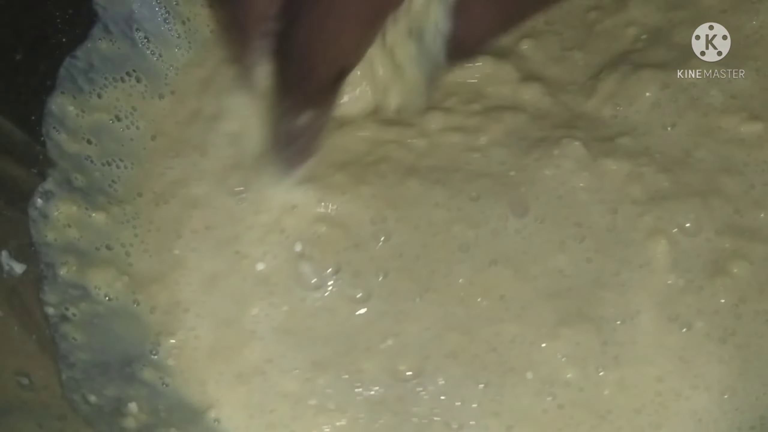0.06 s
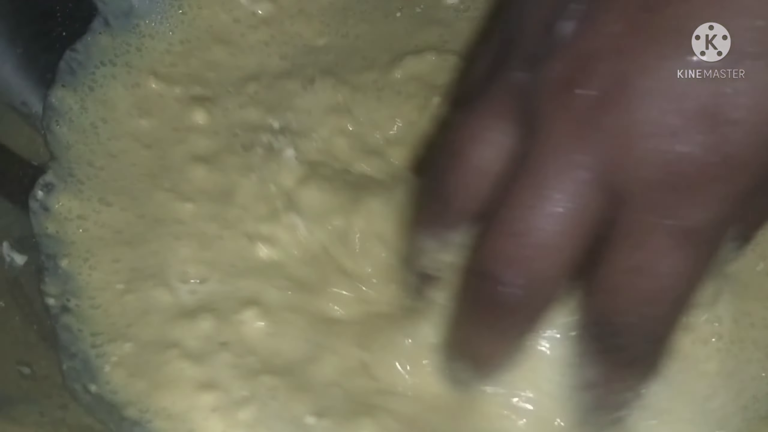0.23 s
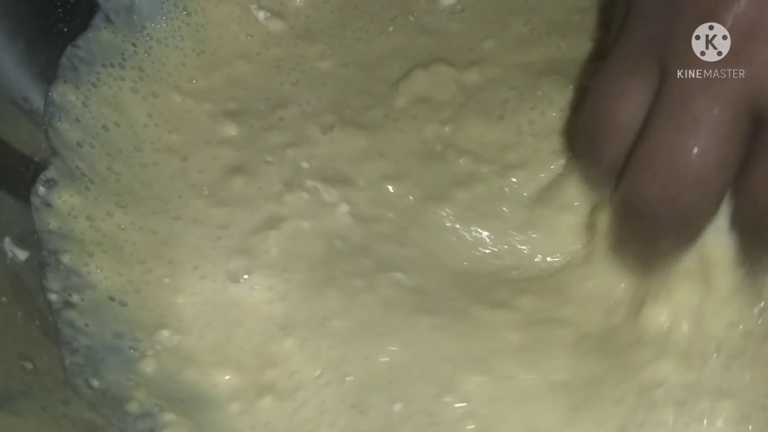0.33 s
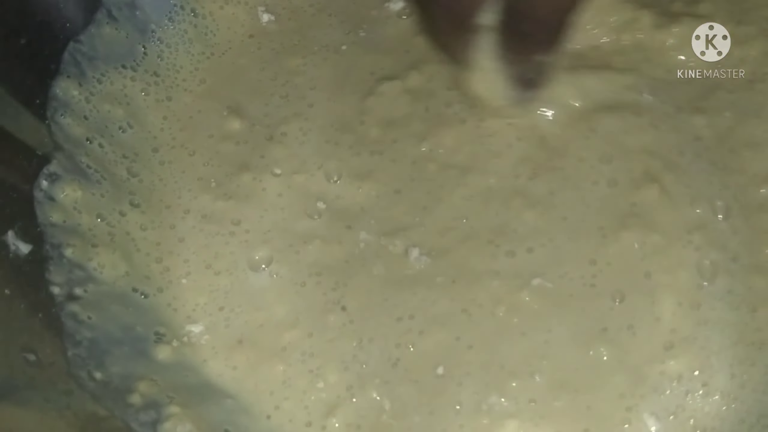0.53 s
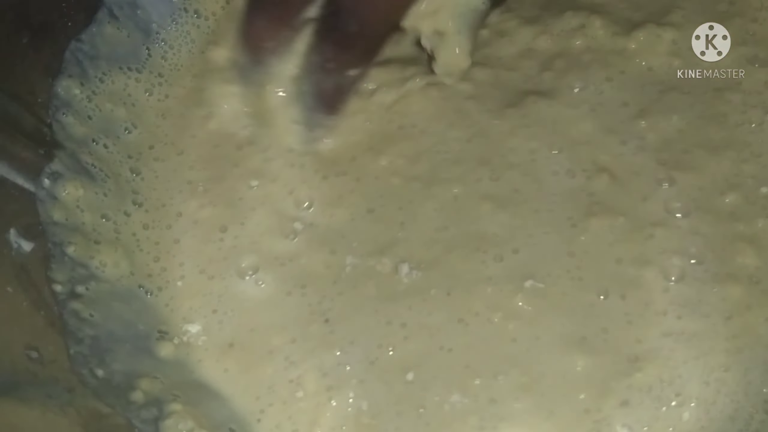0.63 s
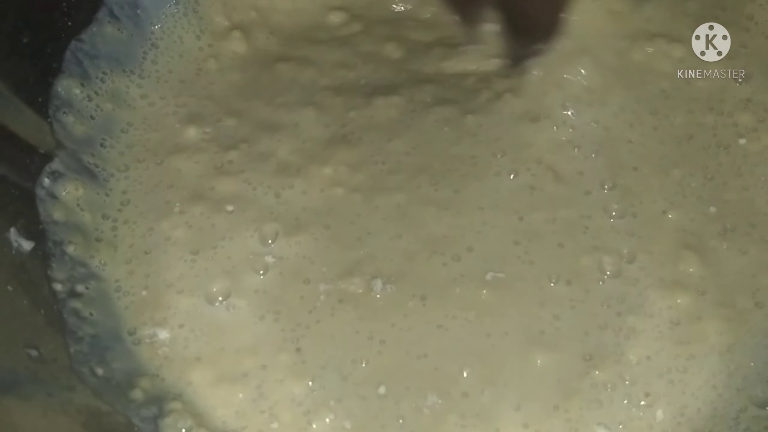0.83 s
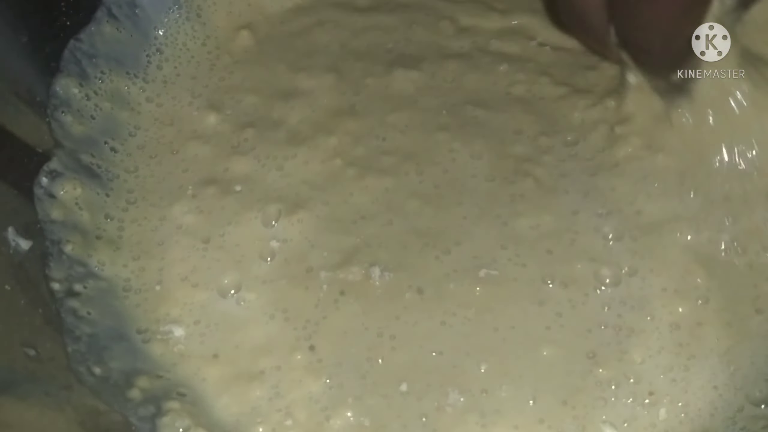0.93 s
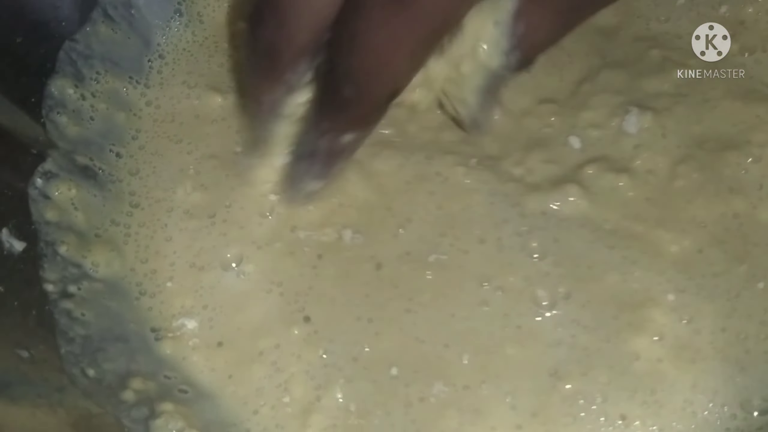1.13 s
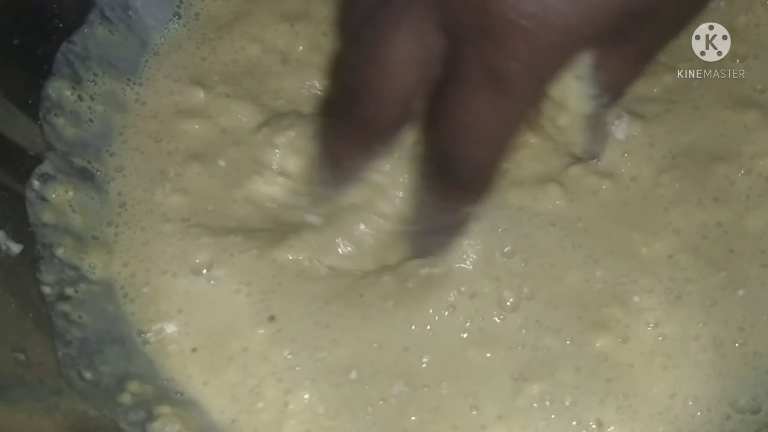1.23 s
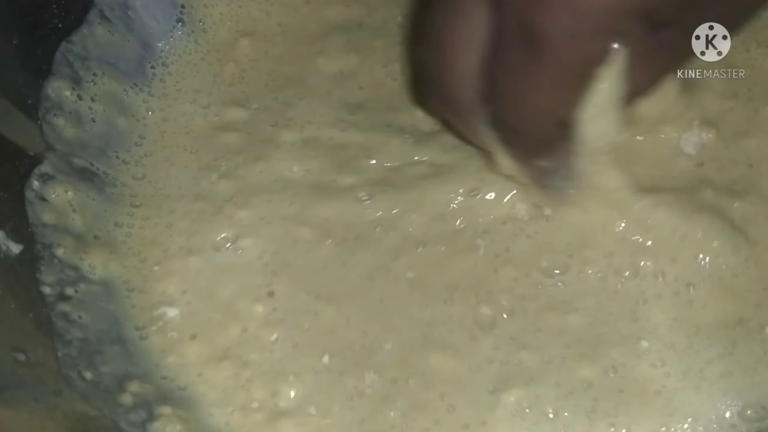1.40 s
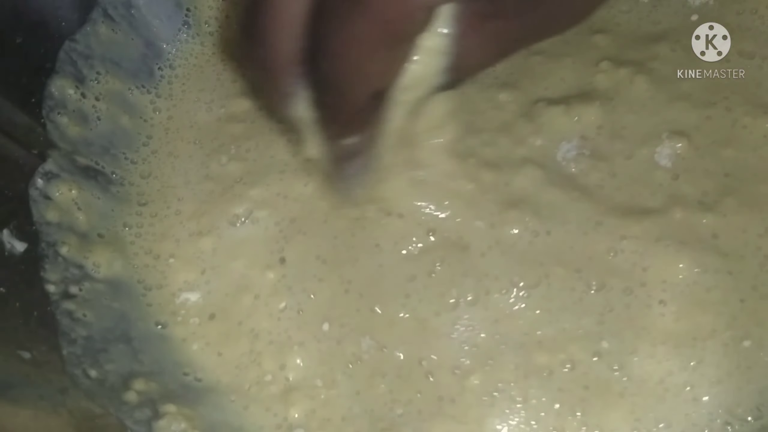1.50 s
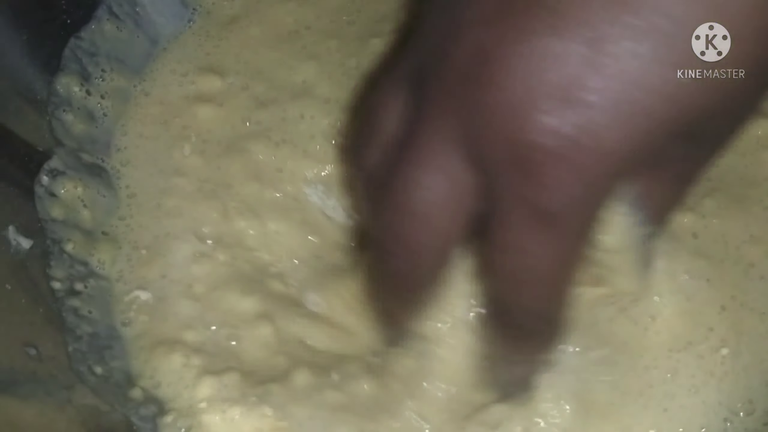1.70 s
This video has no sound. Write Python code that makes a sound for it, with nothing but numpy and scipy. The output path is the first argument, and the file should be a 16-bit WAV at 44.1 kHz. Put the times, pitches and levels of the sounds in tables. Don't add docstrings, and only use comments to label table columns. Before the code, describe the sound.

Knuckles knock sharply on a damped metal bowl as fingers stir wet batter in a kitchen

```python
import sys
import numpy as np
from scipy import signal
from scipy.fft import rfft, irfft, next_fast_len
from scipy.io import wavfile
from scipy.ndimage import uniform_filter1d

SR = 44100
rng = np.random.default_rng(int(sys.argv[2]) if len(sys.argv) > 2 else 0)


def dump_mix(stems):
    frames = np.atleast_2d(stems).T
    limited = np.clip(frames, -1, 1)
    pcm = np.round(limited * 32767).astype(np.int16)
    wavfile.write(sys.argv[1], SR, pcm)


def voltage_ratio(decibels):
    exponent = np.asarray(decibels, float) / 20
    return 10 ** exponent


N = 77175

# (time [s], level [dB])
DRONE_LEVEL = [(0, -66.5), (.068, -62.5), (.12, -74), (.19, -66.5), (.28, -54), (.384, -69.5), (.584, -65),
               (.71, -71), (.798, -66.5), (.97, -92.5), (1.022, -69), (1.164, -86), (1.246, -75.5),
               (1.32, -77), (1.432, -79), (1.476, -66.5), (1.56, -72.5), (1.75, -77.5)]
# (frequency [Hz], level per Hz [dB])
LOW_HISS_COLOUR = [(15, -88.5), (25, -46), (92, -8.5), (214, -19.5), (329, -24), (454, -15.5), (543, -6.5),
                   (1350, -8), (1800, -62), (2340, -82), (3960, -120)]
# (frequency [Hz], level per Hz [dB])
HIGH_HISS_COLOUR = [(1060, -69), (1800, -32), (1950, -10), (2110, -2), (2830, -7.5), (3080, -17),
                    (5880, -11), (7450, -3.5), (10000, -34), (13000, -75.5), (22000, -120)]
# (frequency [Hz], time to fall by 60 dB [s])
ROOM_DECAY = [(200, 1), (600, 0.56), (1200, 0.63), (3000, 0.32), (9000, 0.42)]
# (frequency [Hz], level [dB])
ROOM_COLOUR = [(170, -7.5), (350, 1.5), (650, 3.5), (1250, 0), (2100, 4.5), (4500, -3.5), (7300, 0),
               (10000, -9)]
# (frequency [Hz], width [Hz], depth [0-1])
DIFFUSE_DIPS = [(1620, 600, .9), (3800, 450, .9), (4450, 300, .8)]
# (frequency [Hz], width [Hz], depth [0-1])
NEAR_DIPS = [(940, 120, .5), (2150, 300, .5), (5200, 1300, .7)]
# (time [s], level [dB])
STIR_LEVEL = [(0, -61), (.12, -79), (.22, -73.5), (.6, -55.5), (.8, -75.5), (.92, -84), (1.06, -65.5),
              (1.18, -75.5), (1.4, -85), (1.48, -69), (1.6, -71.5), (1.75, -72.5)]
# (frequency [Hz], level [dB])
SNAP_COLOUR = [(300, -37.5), (1200, 0), (3000, -4.5), (5000, 0.5), (7000, -3.5), (9000, -15.5),
               (11500, -20.5), (16000, -24.5)]
# (time [s], peak level [dB], cavity tone [Hz], snap level [dB], time to fall by 60 dB [s])
SMACKS = [(.0072, -51, 2420, -4, 0.044), (0.0119, -51.5, 1120, -10, 0.032), (0.02, -58, 2430, -16, .015),
          (.0515, -55, 2800, -10, 0.0097), (0.3974, -23, 1316, -33, 0.019),
          (0.3985, -36.5, 3180, -7, 0.0044), (0.398, -35.5, 5650, -20, 0.016),
          (0.503, -31.5, 3140, -10, 0.011), (0.5078, -34, 3140, -14, 0.0077),
          (0.5782, -33, 2320, -7.5, 0.012), (0.603, -56, 2230, 5, 0.013), (0.754, -55, 1970, -5, 0.013),
          (0.7904, -59.5, 2500, 1, .02), (0.7932, -53, 2920, -6, 0.013),
          (0.7996, -51.5, 3000, -12.5, 0.038), (.8012, -41, 773, -17.5, 0.014),
          (0.808, -49, 3440, -5.5, 0.0062), (0.8192, -60, 3050, -7, 0.02), (.824, -50, 584, -17, 0.043),
          (0.8624, -57.5, 920, -3, 0.011), (.983, -65, 2570, -10.5, 0.013), (1.0085, -55, 3200, 3.5, 0.013),
          (1.0207, -52.5, 3200, -23, 0.0087), (1.0745, -45, 3200, -8.5, 0.013),
          (1.0752, -51.5, 2315, -19, 0.025), (1.039, -56, 3200, -7, 0.013), (1.0955, -47, 2500, -11, 0.015),
          (1.106, -49, 2460, -5.5, 0.0074), (1.4436, -42, 3080, -11, 0.012),
          (1.4508, -44.5, 2420, -23, 0.018), (1.4535, -50, 2980, -18, .013),
          (1.4713, -54, 2310, -12.5, 0.018), (1.4756, -55.5, 2940, -12, 0.013),
          (1.478, -50.5, 2540, -12, 0.016), (1.512, -38, 1830, -14.5, 0.02),
          (1.5145, -46.5, 2870, -19.5, 0.0098), (1.52, -53.5, 3050, -3, 0.019),
          (1.607, -62, 2420, -23, 0.02)]
# (time [s], peak level [dB], tone [Hz], after-fizz level [dB])
TICKS = [(0.0147, -41, 8060, 2.5), (0.0177, -38, 6630, -2), (.022, -49, 7700, 0), (.054, -48, 6200, -7),
         (.081, -46, 5900, -6), (.099, -52, 8180, -1), (0.344, -45, 7180, 17.5), (0.3564, -19, 4600, -24),
         (.358, -29.5, 7120, 1), (0.3689, -34.5, 7150, -4), (.485, -61, 7650, 13.5), (.539, -54, 7350, 1),
         (0.5793, -41, 6920, 1), (0.784, -53, 7630, -6), (.822, -58, 7270, 4), (.625, -41.5, 7160, -10),
         (0.661, -52.5, 7200, 2.5), (.695, -47.5, 7870, -1), (.906, -63.5, 7500, 1),
         (1.011, -27, 7330, -12), (1.0246, -49, 7000, 4), (1.040, -48, 7240, 0.5), (1.0749, -49.5, 6700, 4),
         (1.1075, -57.5, 8200, 7.5), (1.2011, -35, 6820, -6), (1.4357, -34.5, 7270, -12),
         (1.477, -79, 7240, -15), (1.513, -59, 7240, 10), (1.571, -60, 5500, -3), (1.585, -47.5, 5700, -3),
         (1.664, -62.5, 7240, 7)]
# (time of the peak [s], level [dB], tone [Hz], half length [s])
SQUEAKS = [
    (.0128, -44.5, 2360, 0.0023),
    (.0135, -62, 7070, 0.0021),
    (.800, -58, 1540, 0.0057),
]
# (frequency [Hz], level [dB], time to fall by 60 dB [s])
BOWL_TONES = [(506, -18.5, .5), (641, -14.5, 0.35), (968, -1, .25), (1105, -13.5, 0.5), (1117, -7, 0.081),
              (1228, -11, 0.13), (1400, -2, 0.19), (1453, -6, .12), (1640, -0.5, .15), (2030, 0, 0.04),
              (2496, -7, 0.068), (2970, -8, 0.087), (3120, -4.5, 0.11), (4360, -2.5, 0.026)]
# (time [s], peak level [dB], click tone [Hz], bowl ring level [dB], room level [dB])
KNOCKS = [
    (0.2449, -14.5, 2940, -5, -4.5),
    (0.2470, -27.5, 6900, 2.5, -6),
    (0.2863, -12.5, 3330, -9.5, -7.5),
    (0.3013, -19, 3670, -7.5, 0),
    (0.3106, -27.5, 3500, -16.5, 6.5),
    (0.3165, -28.5, 3000, -3, 1),
    (0.3989, -35, 2100, -3, -1),
]

PORT_HZ, PORT_WIDTH_HZ = 7330, 600
MODE_BLUR_HZ = 22


def unit(x):
    return x / np.sqrt(np.mean(x ** 2) + 1e-20)


def along(points, hz):
    table_hz, value = np.transpose(points)
    return np.interp(np.log(hz + 1), np.log(table_hz + 1), value)


def curve(rows):
    seconds, value = np.transpose(rows)
    return np.interp(np.arange(N) / SR, seconds, value)


def filtered(x, response):
    size = next_fast_len(len(x) + 8192)
    spectrum = rfft(x, size) * response(np.fft.rfftfreq(size, 1 / SR))
    return irfft(spectrum, size)[:len(x)]


def add(track, start_s, x):
    part = track[max(round(start_s * SR), 0):][:len(x)]
    part += x[:len(part)]


def peak(f, hz, width_hz):
    return 1j * f * width_hz / (hz * hz - f * f + 1j * f * width_hz)


def dipped(f, dips=DIFFUSE_DIPS):
    return np.prod([1 - depth * peak(f, hz, width) for hz, width, depth in dips], axis=0)


def mic(f):
    port = 1 + voltage_ratio(4) * peak(f, PORT_HZ, PORT_WIDTH_HZ)
    return port * (0.082 + 1 / (1 + 1j * (f / 9350) ** 6))


def wavering(hz, blur_hz, size):
    drift = np.cumsum(rng.standard_normal(size)) * np.sqrt(2 * np.pi * blur_hz / SR)
    return np.sin(2 * np.pi * hz * np.arange(size) / SR + uniform_filter1d(drift, size=200))


def blip(hz, width_s):
    t = np.arange(SR // 10) / SR - 2 * width_s
    return np.cos(2 * np.pi * hz * t) * np.exp(-(t / width_s) ** 2)


def burst(hz, t60, snap_db, rough, rise_s):
    cavity_q = 4
    t = np.arange(SR // 10) / SR
    noise = rng.standard_normal((2, len(t)))
    roughness = unit(filtered(noise[0], lambda f: peak(f, hz, hz / cavity_q) ** 2))
    tone = (np.sin(2 * np.pi * hz * t) + rough * roughness) / np.hypot(1, rough)
    snap = unit(filtered(noise[1], lambda f: voltage_ratio(along(SNAP_COLOUR, f))))
    snap = snap * voltage_ratio(snap_db - 60 * t / (1.4 * t60 + 0.0015))
    return (tone * voltage_ratio(-60 * t / t60) + snap) * (1 - np.exp(-t / rise_s))


def room(x):
    tail_s, gap_s = 0.7, 0.004
    hz, t, z = signal.stft(rng.standard_normal(round(tail_s * SR)), SR, nperseg=256)
    fade = voltage_ratio(-60 * t / along(ROOM_DECAY, hz)[:, None])
    tail = signal.istft(z * fade, SR, nperseg=256)[1]
    tail = tail / np.linalg.norm(tail)
    tail = filtered(tail, lambda f: voltage_ratio(along(ROOM_COLOUR, f)) * np.sqrt(dipped(f)))
    return signal.fftconvolve(np.pad(x, (round(gap_s * SR), 0)), tail)


def hiss(response, patchy_db):
    z = signal.stft(rng.standard_normal(N + 512), nperseg=512)[2]
    patches = uniform_filter1d(rng.standard_normal(z.shape), size=5, axis=0)
    patches = unit(uniform_filter1d(patches, size=10, axis=1))
    noise = signal.istft(z * voltage_ratio(patchy_db * patches), nperseg=512)[1][:N]
    return unit(filtered(noise, response))


def kitchen():
    drone_hz, drone_width_hz, drone_blur_hz = 318, 90, 30
    drone_db = curve(DRONE_LEVEL)
    low_db = -69.5 + 0.25 * (drone_db - drone_db.mean())
    low = voltage_ratio(low_db) * hiss(lambda f: voltage_ratio(along(LOW_HISS_COLOUR, f)), patchy_db=1.5)

    def high_colour(f):
        ridge = 1 + voltage_ratio(-2) * peak(f, PORT_HZ, PORT_WIDTH_HZ)
        return voltage_ratio(along(HIGH_HISS_COLOUR, f)) / mic(f) * ridge

    high = voltage_ratio(-79.5) * hiss(high_colour, patchy_db=2.5)
    drone = hiss(lambda f: peak(f, drone_hz, drone_width_hz) ** 2, patchy_db=2)
    steady = unit(wavering(drone_hz, drone_blur_hz, size=N))
    return low + high + voltage_ratio(drone_db) * unit(drone + 0.9 * steady)


def crackle(count):
    middle_hz, spread, cycles, size_db = 3200, 0.4, 2.9, 2
    chance = rng.random((count, 2))
    hz = middle_hz * np.exp(spread * rng.standard_normal(count))
    hz = np.clip(hz, 900, 11000)[:, None]
    t = np.arange(300) / SR
    size = voltage_ratio(-size_db * np.log(chance[:, 1:]))
    grains = size * np.sin(2 * np.pi * hz * t) * np.exp(-t * hz / cycles)
    at = (chance[:, :1] * N).astype(int) + np.arange(len(t))
    bubbles = np.bincount(at.ravel(), grains.ravel())[:N]
    return voltage_ratio(curve(STIR_LEVEL) - 3.5) * unit(bubbles)


def batter():
    rough, tick_s, fizz_s = 1.1, 0.00024, 0.015
    smack_room_db, tick_room_db = -12, -9
    pops = []  # (start [s], sound, room level [dB])
    for s, db, hz, snap_db, t60 in SMACKS:
        smack = burst(hz, t60, snap_db, rough, rise_s=0.00025)
        pops.append((s, voltage_ratio(db) * smack, smack_room_db))
    for s, db, hz, fizz_db in TICKS:
        fizz = burst(hz, fizz_s, snap_db=-10.5, rough=rough, rise_s=0.00084)
        tick = blip(hz, tick_s) + voltage_ratio(fizz_db) * fizz
        pops.append((s - 2 * tick_s, voltage_ratio(db - 7) * tick, tick_room_db))
    for s, db, hz, half_s in SQUEAKS:
        pops.append((s - 2 * half_s, voltage_ratio(db) * blip(hz, half_s), smack_room_db))
    out = np.zeros(N)
    for s, pop, room_db in pops:
        add(out, s, pop)
        add(out, s, voltage_ratio(room_db) * room(pop))
    return out


def bowl_ring(t):
    ring = np.zeros(len(t))
    for hz, level_db, t60 in BOWL_TONES:
        struck_db = level_db - 16 + 2.5 * rng.standard_normal()
        ring += voltage_ratio(struck_db - 60 * t / t60) * wavering(hz, MODE_BLUR_HZ, size=len(t))
    return ring


def knocks():
    boom_hz, boom_s, boom_db = 178.7, 0.52, -23.5
    out, t = np.zeros(N), np.arange(SR // 2) / SR
    for s, db, click_hz, ring_db, room_db in KNOCKS:
        hit = bowl_ring(t)
        thud = burst(1250, t60=0.022, snap_db=-12.5, rough=0.5, rise_s=0.00065)
        add(hit, 0, voltage_ratio(3.5) * thud)
        belly = burst(623, t60=0.032, snap_db=-31.5, rough=2.1, rise_s=0.0033)
        add(hit, 0, voltage_ratio(-8.5) * belly)
        hit = voltage_ratio(ring_db) * hit
        click = burst(click_hz, t60=0.0045, snap_db=-4, rough=0.12, rise_s=0.00042)
        add(hit, 0, voltage_ratio(-4) * click)
        add(hit, 0.0002, voltage_ratio(5.5) * blip(click_hz, 0.00017) + voltage_ratio(-21.5) * blip(12500, 0.00006))
        splash = burst(6700, t60=0.011, snap_db=-9.5, rough=3, rise_s=0.003)
        add(hit, 0.001, voltage_ratio(-19) * splash)
        add(out, s, voltage_ratio(db) * hit)
        boom = wavering(boom_hz, MODE_BLUR_HZ, size=len(t)) * (1 - np.exp(-t / 0.012))
        add(out, s, voltage_ratio(db + ring_db + boom_db - 60 * t / boom_s) * boom)
        add(out, s, voltage_ratio(db - 1.5 + room_db) * room(hit))
    return out


def scene():
    low_cut_hz = 250

    def near_response(f):
        return (1j * f / (low_cut_hz + 1j * f)) ** 3 * dipped(f, NEAR_DIPS)

    bowl = knocks() + batter()
    bubbles = filtered(crackle(count=3000), dipped)
    near = filtered(bowl + bubbles, near_response)
    background = filtered(kitchen(), dipped)
    return (near + background)[None]


def low_pass(x):
    return signal.sosfilt(signal.butter(12, 16460, fs=SR, output="sos"), x)


def record(dry):
    heard = filtered(dry[0], mic)
    own_noise = voltage_ratio(-92.5) * rng.standard_normal(N)
    return low_pass((heard + own_noise)[None])


dry = scene()
out = record(dry)
dump_mix(out)
```